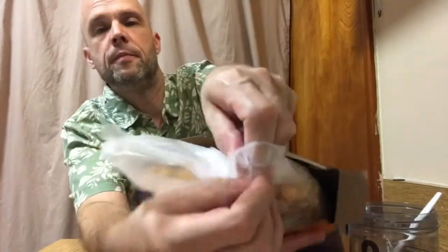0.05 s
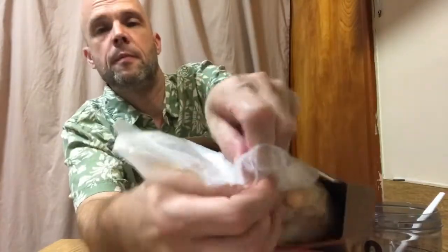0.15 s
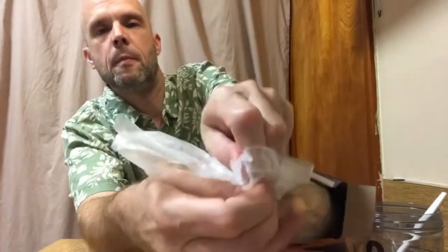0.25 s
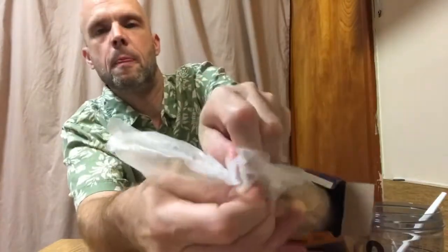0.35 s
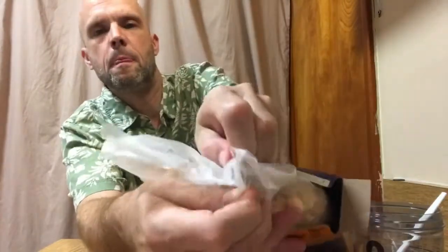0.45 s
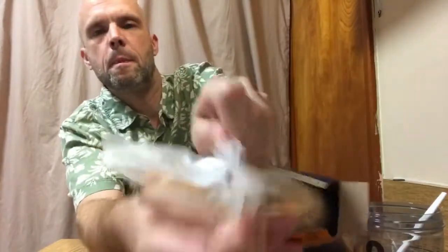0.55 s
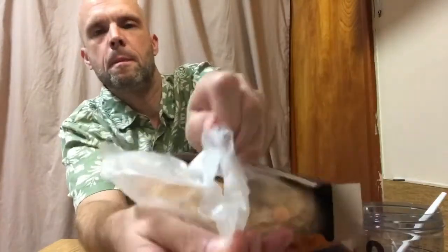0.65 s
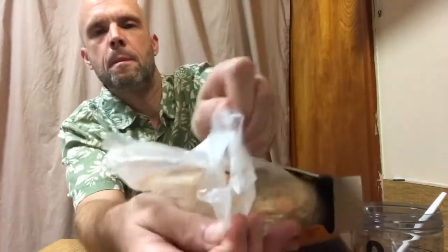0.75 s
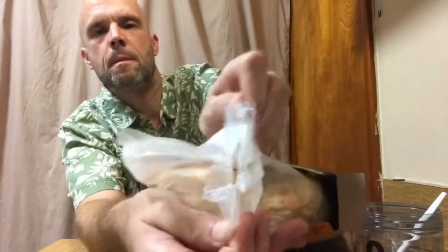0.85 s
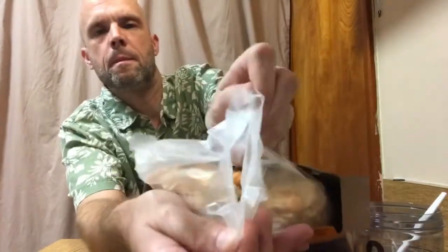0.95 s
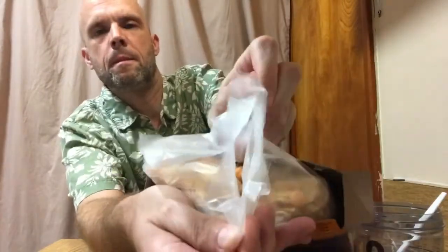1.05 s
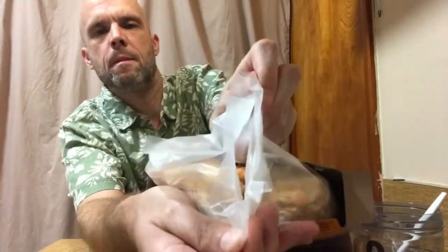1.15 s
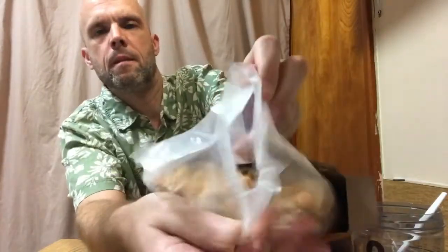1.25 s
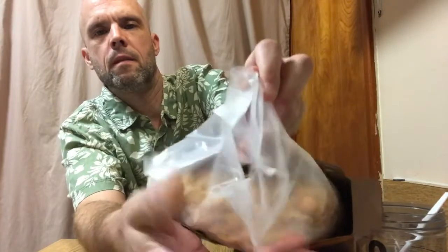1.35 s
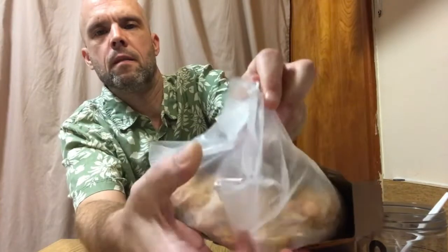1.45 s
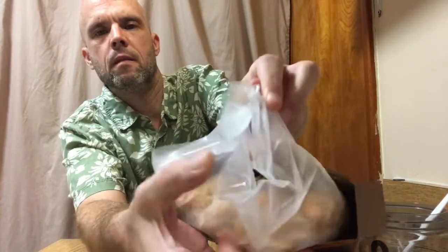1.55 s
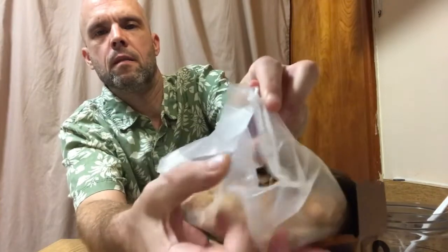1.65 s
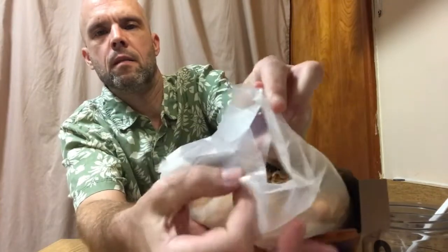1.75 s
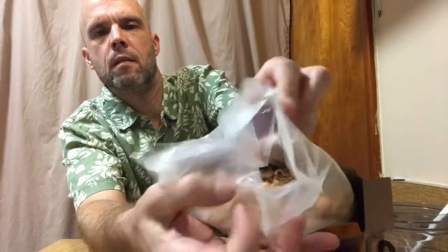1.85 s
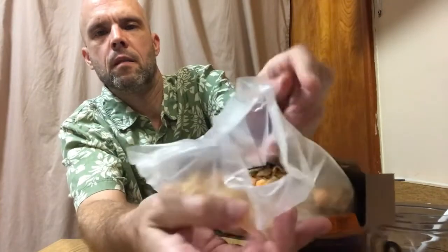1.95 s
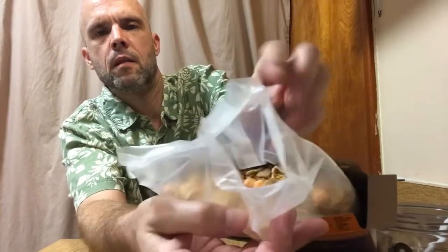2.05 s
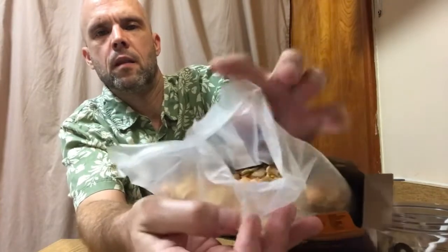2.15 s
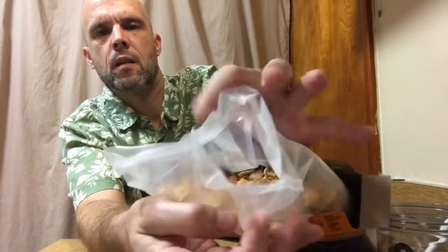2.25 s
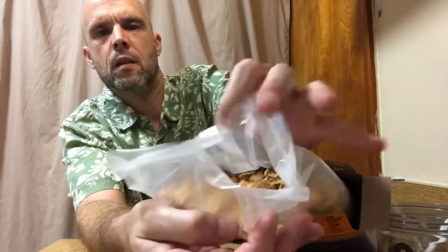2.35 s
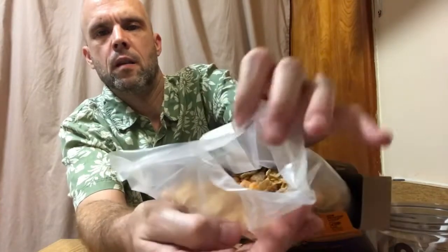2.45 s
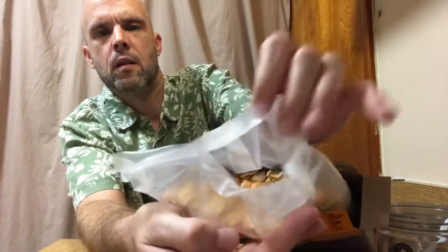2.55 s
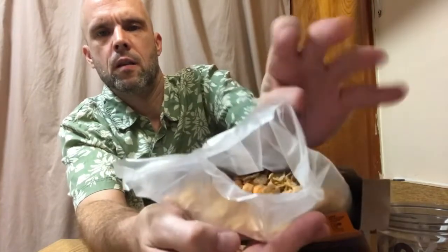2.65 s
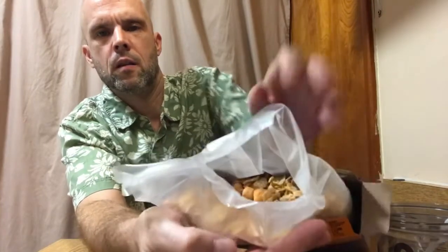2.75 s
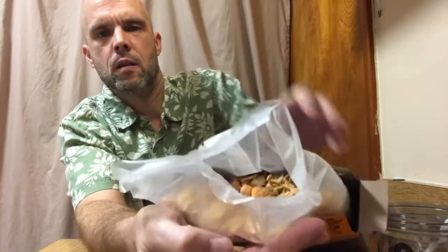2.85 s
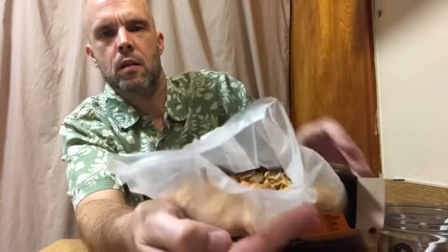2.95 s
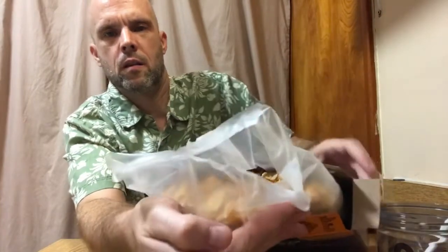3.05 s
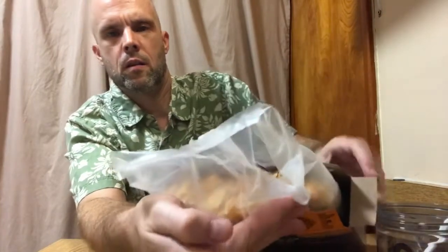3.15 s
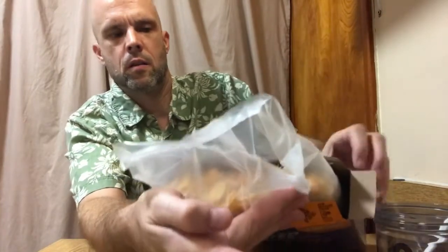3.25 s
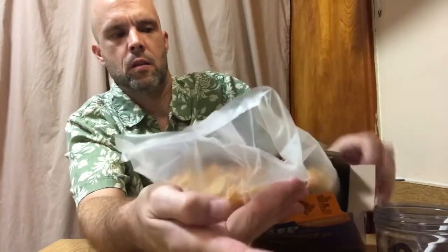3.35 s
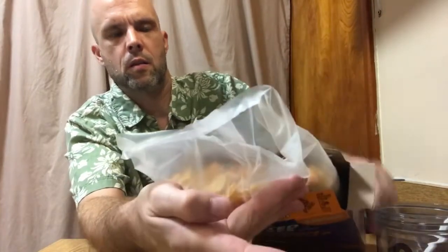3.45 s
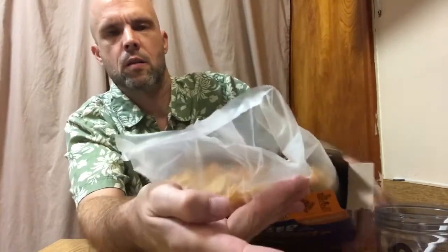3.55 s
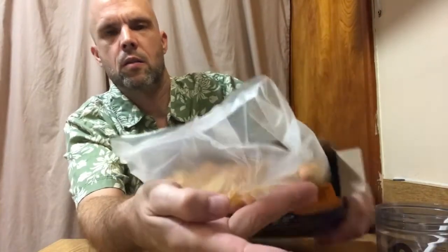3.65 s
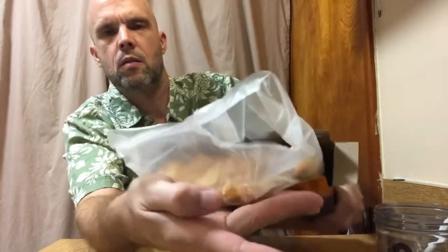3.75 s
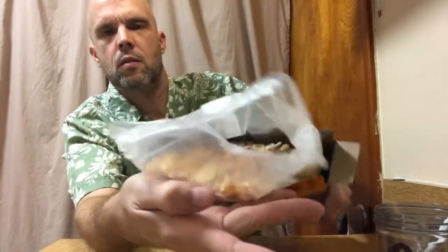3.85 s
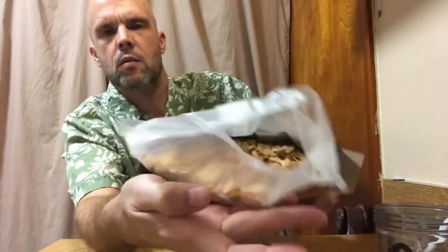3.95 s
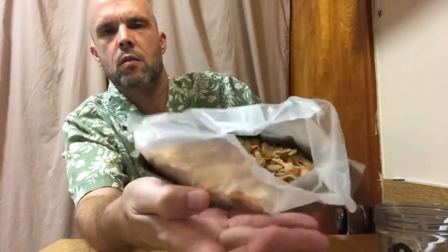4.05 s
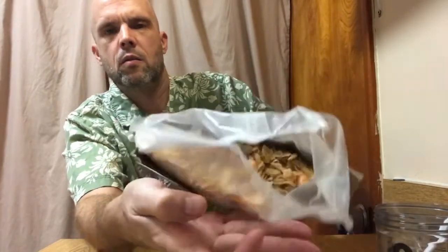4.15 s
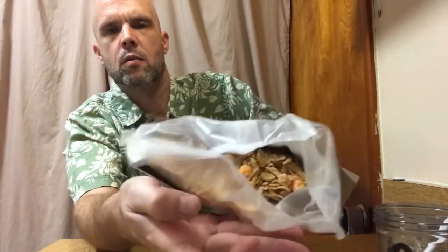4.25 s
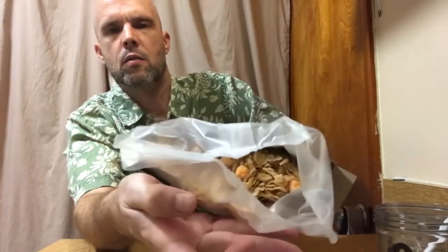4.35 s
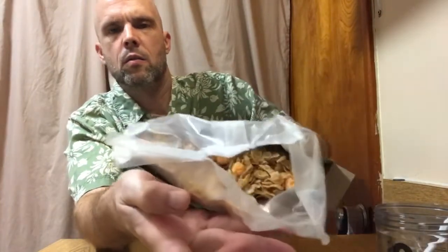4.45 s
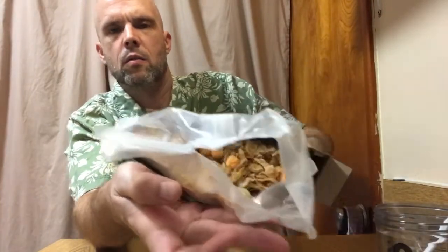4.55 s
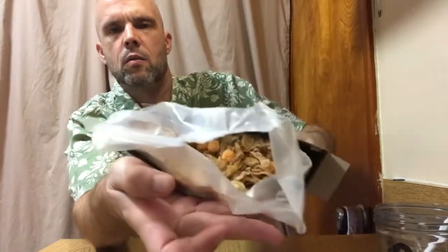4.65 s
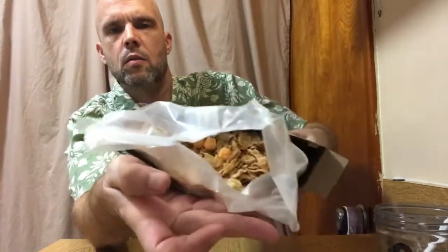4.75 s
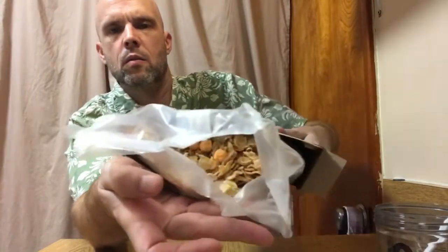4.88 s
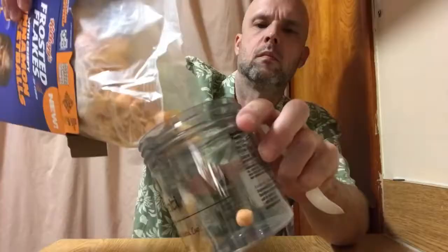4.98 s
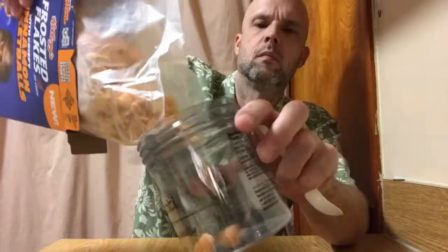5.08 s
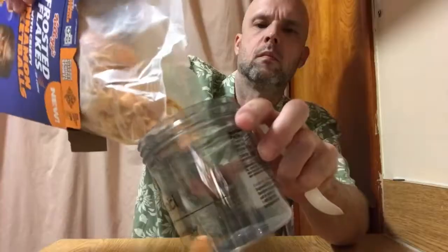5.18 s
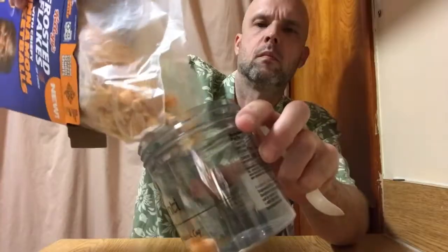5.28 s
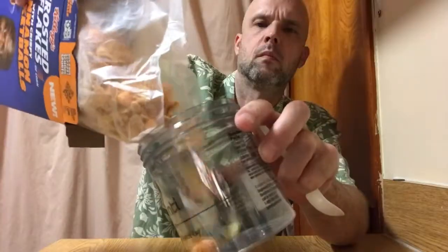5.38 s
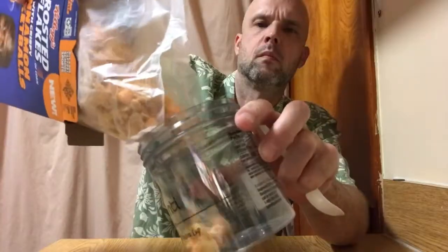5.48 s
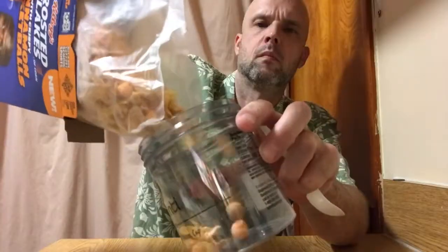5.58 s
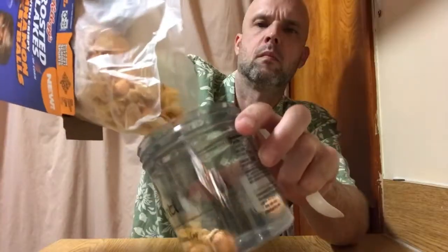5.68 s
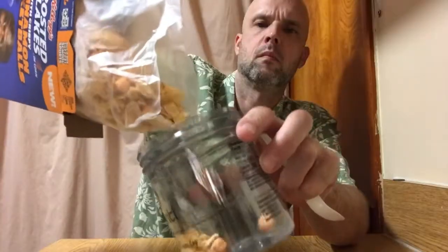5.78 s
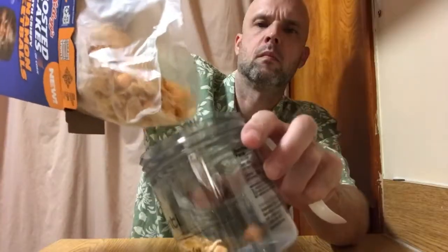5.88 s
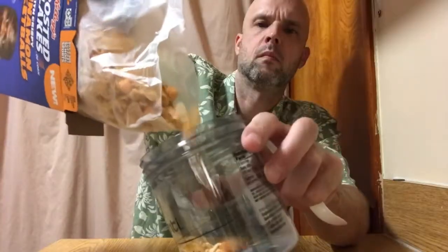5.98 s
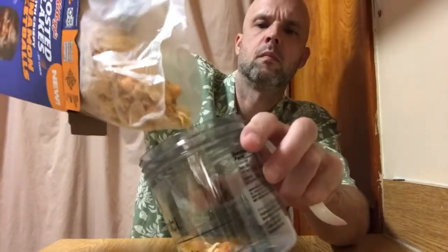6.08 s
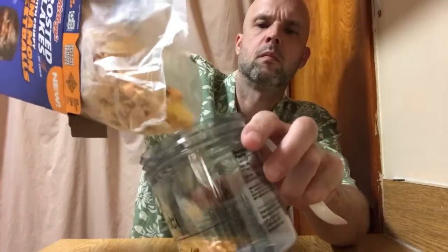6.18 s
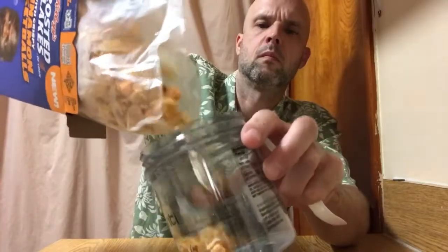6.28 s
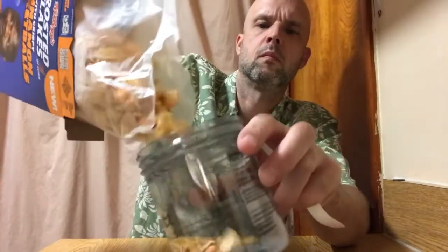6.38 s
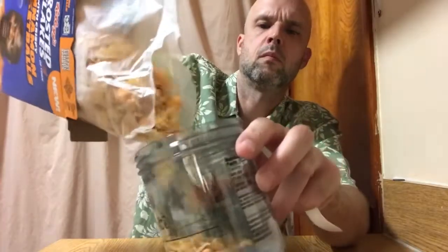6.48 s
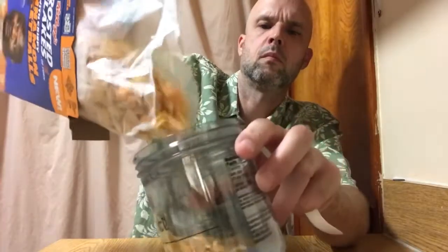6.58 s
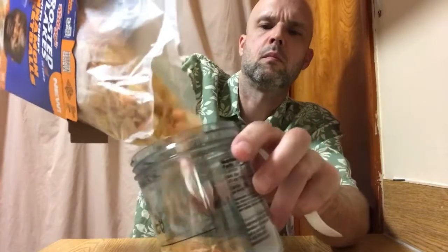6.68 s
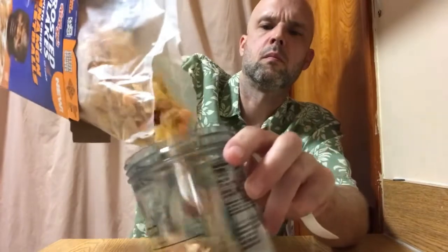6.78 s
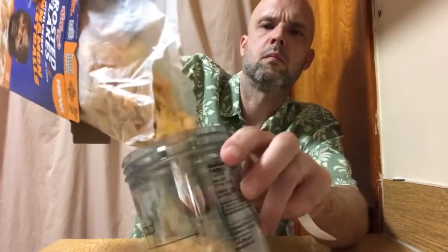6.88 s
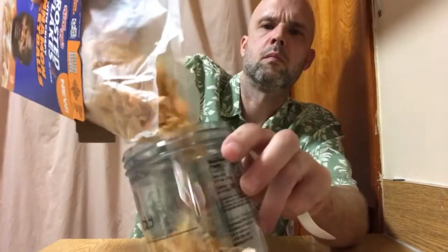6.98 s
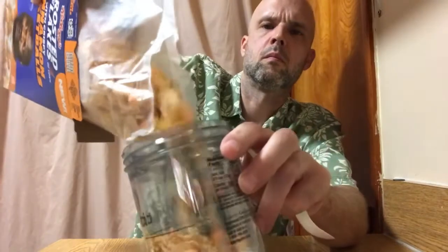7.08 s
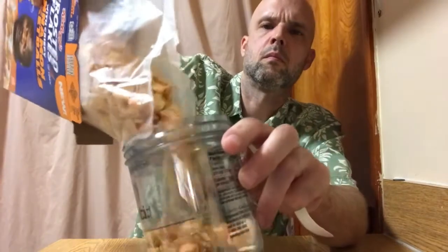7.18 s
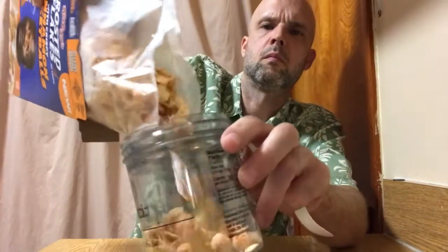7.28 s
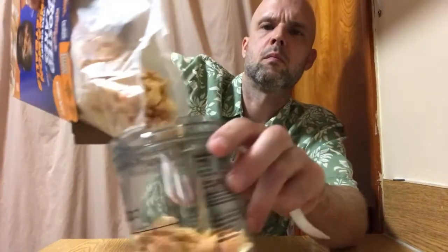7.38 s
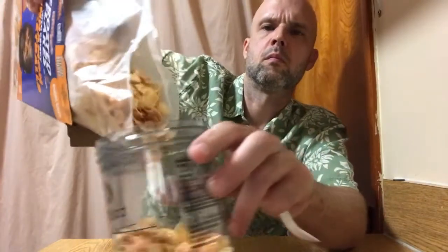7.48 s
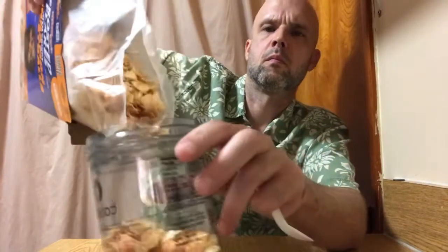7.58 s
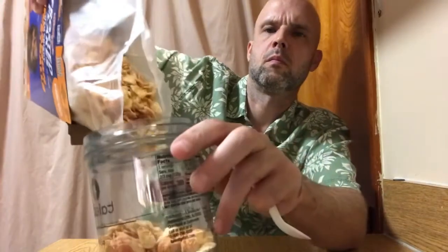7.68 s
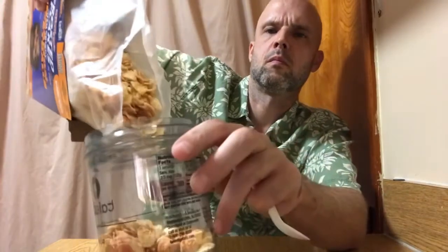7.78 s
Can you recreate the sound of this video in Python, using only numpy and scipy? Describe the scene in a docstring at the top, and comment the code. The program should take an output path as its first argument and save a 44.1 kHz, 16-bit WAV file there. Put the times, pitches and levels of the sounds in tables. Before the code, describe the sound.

A stiff plastic liner bag snaps and crackles loudly as it is pulled open, then dry cereal clatters into a hollow plastic cup.

```python
"""Plastic film snaps, creaks and crackles as a cereal liner is pulled open, with dull knocks on its carton.
Then flakes and puffed balls clatter into a hollow plastic cup, over a low hum in a small room.
Film sounds are noise bursts, random ticks and repeated slips, coloured by spectra and resonances.
Carton and cup are banks of struck, decaying modes; pieces add noise clacks and brittle crunches.
Crumbs and sliding flakes are grains of noise; the hum is a sine over filtered noise."""
import sys
import numpy as np
from scipy import signal
from scipy.fft import rfft, irfft
from scipy.io import wavfile

SR = 44100
rng = np.random.default_rng(int(sys.argv[2]) if len(sys.argv) > 2 else 0)


def file_out(sig):
    """Save sig as 16-bit WAV at sys.argv[1]."""
    # one column per channel
    cols = np.atleast_2d(sig).T
    # limit, then scale
    lim = np.clip(cols, -1, 1)
    pcm = np.round(lim * 32767).astype(np.int16)
    wavfile.write(sys.argv[1], SR, pcm)


N = 344862
TIME = np.arange(N) / SR
POUR_START_S = 4.966

# spectrum of a dry piece clacking on the cup: (frequency [Hz], level [dB])
CLACK_SPECTRUM = [(400, -36), (700, 5), (1150, -5.5), (2200, -3.5), (3500, -7), (5000, -9), (7500, -12),
                  (12000, -35)]
# spectrum of brittle edges breaking: (frequency [Hz], level [dB])
CRUNCH_SPECTRUM = [(1500, -18.5), (3500, 4), (5000, 2), (6700, 1), (8000, -8.5), (9300, -2), (10400, -11),
                   (11700, -8), (16000, -3)]


def from_db(db):
    """Decibels to gain."""
    return 10 ** (np.asarray(db) / 20)


def rms_one(x):
    """Scale to rms 1."""
    return x / np.sqrt(np.mean(x ** 2) + 1e-20)


def attack_one(x, size=220):
    """Scale a hit so that its first samples have rms 1."""
    return x / np.sqrt(np.mean(x[:size] ** 2) + 1e-20)


def over_time(points):
    """Read a (time, level) curve at every sample."""
    s, level = np.transpose(points)
    return np.interp(TIME, s, level)


def at_hz(points, hz):
    """Read a table on a log-frequency axis."""
    f, value = np.transpose(points)
    return np.interp(np.log(np.maximum(hz, 1)), np.log(f), value)


def add(out, s, sound):
    """Mix a sound in at time s, trimming whatever falls outside the scene."""
    start = round(s * SR)
    sound, start = sound[max(-start, 0):], max(start, 0)
    out[start:start + len(sound)] += sound[:max(N - start, 0)]


def response(spectrum, size=4096):
    """Causal (minimum-phase) impulse response with the given spectrum."""
    magnitude = from_db(at_hz(spectrum, np.fft.rfftfreq(size, 1 / SR)))
    cepstrum = irfft(np.log(magnitude))
    # fold the cepstrum forward in time to get minimum phase
    cepstrum[1:size // 2] *= 2
    cepstrum[size // 2 + 1:] = 0
    return irfft(np.exp(rfft(cepstrum)))[:size // 2]


def through(x, impulse):
    """Pass a signal through an impulse response."""
    return signal.oaconvolve(x, impulse)[:len(x)]


def band(x, hz, kind, order=2):
    """Butterworth filter."""
    sos = signal.butter(order, np.clip(hz, 10, 0.45 * SR), kind, fs=SR, output="sos")
    return signal.sosfilt(sos, x)


def resonance(x, hz, q):
    """One resonant peak."""
    return signal.lfilter(*signal.iirpeak(min(hz, SR / 3), q, SR), x)


def fading(t60, size):
    """Exponential decay by 60 dB in t60 seconds."""
    return np.exp(-np.log(1000) * TIME[:size] / t60)


def burst(t60, size=4096):
    """Noise that dies away: many close, damped modes."""
    return rng.standard_normal(size) * fading(t60, size)


def struck(modes, scatter_db, tilt_db=0, detune=0.01, size=8192):
    """Ringing modes; each blow lands elsewhere, under a shifting load: new strengths, slightly new pitches."""
    hz, db, t60 = np.transpose(modes)[:, :, None]
    hz = hz * (1 + detune * rng.standard_normal(hz.shape))
    gain = from_db(db + tilt_db + scatter_db * rng.standard_normal(hz.shape))
    gain = gain * rng.choice([-1, 1], hz.shape)
    return np.sum(gain * np.sin(2 * np.pi * hz * TIME[:size]) * fading(t60, size), axis=0)


def grains(spectrum, per_s, spread_db, t60):
    """Random ticks of uneven size, each a fresh burst of noise that dies away; rms 1."""
    at = np.flatnonzero(rng.random(N) < per_s / SR)
    kicks = np.full(N, 1e-18)
    kicks[at] = from_db(spread_db * np.minimum(rng.exponential(1, N)[at], 4)) ** 2
    # every kick of energy leaks away by 60 dB in t60
    energy = signal.lfilter([1], [1, -from_db(-120 / (t60 * SR))], kicks)
    return rms_one(through(np.sqrt(energy) * rng.standard_normal(N), response(spectrum)))


def swarm(events, spread_s):
    """Level of the small ticks that crowd around each large event."""
    out = np.zeros(N)
    bell = signal.windows.gaussian(4096, spread_s * SR)
    for s, db, *_ in events:
        add(out, s - len(bell) / 2 / SR, from_db(db) * bell)
    return out


def scattered(start_s, end_s, per_s, level_db, low_hz, high_hz, spread_db=3.5):
    """Chance events whose strength follows a level curve: rows (time [s], level [dB], pitch [Hz])."""
    when, strength, pitch = rng.random((200, 3)).T
    # one event in each slot of 1 / per_s seconds
    s = start_s + (np.arange(len(when)) + when) / per_s
    db = np.interp(s, TIME, level_db) + spread_db * (2 * strength - 1)
    hz = low_hz * (high_hz / low_hz) ** pitch
    return np.transpose([s, db, hz])[s < end_s]


def background(hum_hz=59.2, hum_db=-57, air_db=-54.5):
    """Room rumble with a faint hiss, as filtered noise, and a low sine hum."""
    # (frequency [Hz], level [dB])
    room_tone = [(25, -21), (40, -10), (55, -2), (70, -3), (125, -4), (165, -9), (240, -21), (450, -32),
                 (800, -37), (1700, -42), (4000, -47), (16000, -60)]
    air = rms_one(through(rng.standard_normal(N), response(room_tone, size=16384)))
    hum = rms_one(np.sin(2 * np.pi * hum_hz * TIME))
    return from_db(air_db) * air + from_db(hum_db) * hum


def effort(attack_s=0.014, release_db_per_s=334):
    """How hard the film is worked, in dB: each tug rises, holds and lets go, over a slower strain."""
    # tugs of the hands: (time of full pull [s], hold [s], crackle level [dB])
    tugs = [(0.0, 0.081, -31), (0.126, 0.18, -31), (0.368, 0.058, -36.5), (0.535, 0.061, -34.5),
            (0.735, 0.063, -43), (0.871, 0.039, -36.5), (1.019, 0.2, -38), (1.217, 0.047, -30.5),
            (1.371, 0.059, -33.5), (1.494, 0.025, -37), (1.6, 0.041, -42), (1.693, 0.048, -39),
            (1.82, 0.056, -36.5), (2.122, 0.058, -42.5), (2.31, .17, -45.5), (2.534, 0.081, -39),
            (2.939, 0.12, -39.5), (3.119, .08, -51), (3.519, 0.31, -53.5), (3.583, 0.19, -46),
            (3.995, 0.12, -52.5), (4.11, 0.14, -60)]
    # strain between tugs, as its crackle; it eases once the bag is open: (time [s], level [dB])
    strain = [(0, -46.5), (1.85, -47.5), (2.55, -54), (2.72, -62.5), (3.45, -67), (3.85, -57.5),
              (4.38, -68.5), (4.65, -63), (4.93, -70)]
    power = from_db(over_time(strain)) ** 2
    t = TIME[:SR] - attack_s
    rise = np.clip(1 + t / attack_s, 0, 1)
    for s, hold, db in tugs:
        tug_db = db - release_db_per_s * np.maximum(t - hold, 0)
        add(power, s - attack_s, (rise * from_db(tug_db)) ** 2)
    return 10 * np.log10(power)


def snap(film, hz, treble_db, crack_t60=0.013, flutter_db=-19, flutter_t60=0.093, facet_q=3.3, facet_db=-1):
    """A crease flips: a crack, the short ring of its facet, and a flutter of the film around it."""
    kick = burst(crack_t60) + from_db(flutter_db) * burst(flutter_t60)
    # a slack crease flips slowly and sounds dull throughout
    body = band(through(kick, film), 14000 * from_db(1.7 * treble_db), "low", order=1)
    facet = attack_one(resonance(body, hz, facet_q))
    body = attack_one(attack_one(body) + from_db(facet_db) * facet)
    treble = attack_one(band(kick, 7400, "high", order=3))
    return attack_one(body + from_db(treble_db) * treble)


def creak(film, length, first_rate, last_rate, hz, q, slip_t60=0.0055, rub_db=-1):
    """Near-regular stick-slip jerks, swelling and fading, shake the film and one of its resonances."""
    size = int(length * SR)
    phase = np.cumsum(np.linspace(first_rate, last_rate, size)) / SR
    slips = np.diff(np.floor(phase), prepend=0)
    rub = through(through(slips, fading(slip_t60, size)) * rng.standard_normal(size), film)
    rub = rms_one(band(rub, 2 * hz, "low", order=1))
    sound = rms_one(resonance(slips, hz, q)) + from_db(rub_db) * rub
    return rms_one(sound * signal.windows.tukey(size, 0.5))


def bag():
    """Snaps, creaks and rushing folds stand over a fine crackle and the dull flexing of the sheet."""
    # loudest creases flipping over: (time [s], level [dB], facet pitch [Hz])
    snaps = [(0.0223, -20, 4300), (0.1255, -31, 2540), (0.2452, -18, 4650), (0.2662, -32, 3450),
             (0.2875, -18.5, 6140), (0.3236, -27, 3160), (0.3315, -26, 6700), (0.3636, -24, 3760),
             (0.4108, -24.5, 5900), (0.4844, -28.5, 4000), (0.4979, -18.5, 1520), (0.528, -19.5, 4050),
             (0.5398, -15, 3860), (0.5932, -24.5, 3490), (0.659, -29, 4040), (0.7125, -28, 3900),
             (0.7706, -28.5, 1580), (0.8753, -18.5, 4400), (0.909, -19, 4260), (0.99, -33.5, 4310),
             (1.0235, -31, 4480), (1.0628, -25.5, 3950), (1.1333, -29.5, 2860), (1.174, -24, 2760),
             (1.2559, -19, 4700), (1.4175, -24.5, 3280), (1.4636, -27.5, 1770), (1.586, -23.5, 1870),
             (1.6113, -26, 7460), (1.6943, -24, 6240), (1.7341, -21.5, 4430), (1.8246, -33, 4100),
             (1.8655, -26.5, 4370), (2.0384, -35, 1580), (2.086, -32, 1860), (2.1382, -27.5, 5600),
             (2.2027, -28, 5060), (2.223, -31, 3570), (2.3342, -32, 5640), (2.3711, -32.5, 3830),
             (2.436, -30.5, 2750), (2.4688, -32, 4180), (2.517, -27, 4100), (2.5411, -18, 4340),
             (2.8539, -41.5, 2670), (2.9213, -34.5, 3120), (2.9415, -30.5, 4610), (2.9923, -23.5, 6800),
             (3.12, -36, 4870), (3.2837, -48, 1980), (3.685, -35, 2020), (4.0439, -30, 2500),
             (4.1803, -39, 3420), (4.2214, -41, 2040), (4.6596, -49.5, 1884), (4.7916, -53.5, 1700),
             (5.3585, -35, 6500), (7.524, -45, 6500)]
    # film sticking and slipping under the fingers:
    # (time [s], length [s], slips at start [1/s], slips at end [1/s], level [dB], resonance [Hz], Q [-])
    creaks = [(0.04, 0.069, 360, 244, -35, 3830, 14), (1.019, 0.2, 137, 120, -45, 135, 12),
              (1.621, 0.062, 290, 394, -41.5, 1060, 15), (3.155, 0.043, 390, 360, -47, 2100, 8.4)]
    # whole folds giving way in a rush of small snaps: (time [s], level [dB], t60 [s])
    crushes = [(0.364, -19.5, 0.056), (0.526, -25, 0.22), (.537, -16.5, 0.19), (.872, -24, 0.25),
               (.908, -23.5, .12), (1.243, -30.5, 0.3), (1.413, -37, 0.16), (1.504, -26, 0.1),
               (2.545, -25.5, 0.24), (3.747, -44, 0.088)]
    # colours of snaps and creaks, of the crackle, and of the flexing: (frequency [Hz], level [dB])
    film_spectrum = [(100, -18), (300, -4.5), (700, -7.5), (1600, -0.5), (4000, 2.5), (7000, 0.5),
                     (9000, -7), (10500, -21), (16000, -25)]
    crackle_spectrum = [(200, -13), (450, -5.5), (800, 1.5), (1500, 3.5), (4100, 1.5), (5200, -2.5),
                        (6800, -1), (10400, -13), (12000, -7), (15500, -12)]
    flex_spectrum = [(50, -31.5), (90, -9.5), (130, 0.5), (180, -5), (240, -2.5), (340, 0.5), (460, -11.5),
                     (700, -7.5), (1500, -35.5)]
    out, film, effort_db = np.zeros(N), response(film_spectrum), effort()

    # lesser creases flip at random, 3 dB over the crackle on average
    small = scattered(0, POUR_START_S, per_s=10, level_db=effort_db + 3, low_hz=1500, high_hz=6500)
    for s, db, hz in [*snaps, *small]:
        # small facets and hard snaps are brighter: 1 dB per octave, 0.16 dB per dB
        treble_db = -4.5 + np.log2(hz / 4000) + 0.16 * (db + 25)
        add(out, s, from_db(db) * snap(film, hz, treble_db))

    for s, length, first_rate, last_rate, db, hz, q in creaks:
        add(out, s, from_db(db) * creak(film, length, first_rate, last_rate, hz, q))

    rush = from_db(-16) * swarm(snaps, spread_s=0.005)
    for s, db, t60 in crushes:
        add(rush, s, from_db(db) * fading(t60, size=16384))
    out += rush * grains(crackle_spectrum, per_s=2200, spread_db=1.5, t60=0.005)

    crackle = grains(crackle_spectrum, per_s=550, spread_db=3.0, t60=0.011)
    # gentle handling is duller: below -30 dB the top falls 0.55 dB per dB of effort
    dull = band(crackle, 4800, "low", order=1)
    crackle = dull + (crackle - dull) * np.clip(from_db(0.55 * (effort_db + 30)), 0, 1)
    # the whole sheet flexes with 0.71 of the swing of the effort
    flex = grains(flex_spectrum, per_s=300, spread_db=-0.5, t60=0.012)
    flex_db = -41.5 + 0.71 * (effort_db + 35)
    handling = from_db(effort_db) * crackle + from_db(flex_db) * flex
    return out + (TIME < POUR_START_S) * handling


def carton():
    """Knocks on the cardboard; a soft contact reaches only its lowest modes."""
    # (time [s], level [dB], contact cut-off [Hz])
    bumps = [(0.123, -35.5, 500), (0.365, -33, 350), (.545, -26.5, 257), (0.591, -34, 110),
             (0.906, -26, 200), (1.261, -32.5, 150), (1.508, -35.5, 110), (2.621, -40, 111.5),
             (3.731, -28, 520), (6.018, -40.5, 500)]
    # cardboard modes: (frequency [Hz], level [dB], t60 [s])
    modes = [(85, -9.5, 0.18), (130, -2.5, 0.055), (192, -4, 0.14), (275, -3.5, 0.032), (359, -1, 0.17),
             (398, 4.5, 0.015), (520, 3, 0.021), (900, -2, 0.026)]
    out = np.zeros(N)
    for s, db, contact_hz in bumps:
        knock = band(struck(modes, scatter_db=2.5), contact_hz, "low")
        add(out, s, from_db(db) * attack_one(knock, size=600))
    return out


def landing(clack, hz, crack_t60=0.015, focus_db=9, wall_db=-3, settle_db=-18, settle_t60=0.15,
            contact_s=0.00071, piece_db=-4):
    """A dry piece clacks on the cup and settles; piece and wall ring most near hz."""
    # modes of the cup's wall: (frequency [Hz], level [dB], t60 [s])
    wall_modes = [(1406, -1, 0.096), (1576, 6, 0.012), (1985, 4, 0.083), (2160, -5.5, 0.076),
                  (2500, 5.5, 0.026), (2430, -1, 0.021), (2560, -15, 0.16), (2760, -12, 0.036),
                  (3350, -18, 0.036), (3290, 12.5, 0.011), (3410, -1, 0.015), (3500, -6, 0.09),
                  (3826, 2.5, 0.045), (4250, -9.5, 0.21), (4400, -26.5, 0.095), (5730, 2.5, 0.06),
                  (5860, 2.5, 0.036), (6430, -8, 0.0088), (7000, -6, 0.09), (7960, -10, 0.1)]
    kick = burst(crack_t60) + from_db(settle_db) * burst(settle_t60)
    crack = attack_one(through(kick, clack), size=350)
    piece = from_db(piece_db) * attack_one(resonance(crack, hz, q=6), size=350)
    # wall modes weaken by focus_db per octave away from hz
    octaves = np.abs(np.log2(np.array(wall_modes)[:, :1] / hz))
    wall = struck(wall_modes, scatter_db=4.5, tilt_db=-focus_db * octaves, size=4096)
    wall = from_db(wall_db) * attack_one(wall, size=350)
    contact = 1 - np.exp(-TIME[:len(wall)] / contact_s)
    return attack_one((crack + piece + wall) * contact, size=350)


def hollow():
    """The cup's body takes a moment to swing up and radiates little below its lowest mode."""
    # lowest modes of the cup: (frequency [Hz], level [dB], t60 [s])
    body_modes = [(606, -2, .08), (640, -3, .06), (728, 1, .075), (772, -1, .055), (950, -10, .05),
                  (1015, -13, .05)]
    ring = band(struck(body_modes, scatter_db=2, size=5500), 555, "high", order=10)
    return attack_one(band(ring, 1200, "low"), size=600)


def brittle_edges(crunch):
    """Brittle edges crack, then scrape along the wall."""
    return attack_one(through(burst(0.02) + from_db(-15) * burst(0.12), crunch), size=350)


def patter():
    """Small crumbs hitting the cup, each size with a pitch of its own; rms 1."""
    crumbs = np.zeros(N)
    for hz in (2040, 2420, 3770, 5160):
        ticks = grains(CLACK_SPECTRUM, per_s=80, spread_db=2.8, t60=0.014)
        crumbs += rms_one(resonance(ticks, hz, q=2.5))
    crumbs = rms_one(crumbs)
    crumbs += from_db(-6) * grains(CRUNCH_SPECTRUM, per_s=200, spread_db=3.3, t60=0.013)
    # each also gives the hollow body a faint knock
    knocks = band(crumbs, [590, 810], "band", order=4)
    return rms_one(crumbs + from_db(-8.5) * rms_one(knocks))


def cereal():
    """Big pieces land one by one amid a patter of crumbs, while flakes hiss down the film."""
    # loudest pieces: (time [s], clack level [dB], hollow ring level [dB], brightest pitch [Hz])
    landings = [(4.9664, -22.5, -18, 2380), (4.9812, -24, -32.5, 2200), (4.9874, -22, -36, 2040),
                (5.0155, -22.5, -29, 3300), (5.0263, -29.5, -35, 4440), (5.0609, -27.5, -32, 2000),
                (5.1094, -35, -42, 2020), (5.2813, -27, -27.5, 2070), (5.3789, -17, -28, 3300),
                (5.4069, -22, -29.5, 4130), (5.416, -23, -31, 3850), (5.4417, -27.5, -33, 2450),
                (5.4645, -21.5, -29, 4440), (5.4786, -25, -29, 2060), (5.5003, -25.5, -27, 3320),
                (5.5874, -16, -22.5, 3100), (5.6577, -18.5, -21.5, 1960), (5.7014, -34, -44, 5800),
                (5.742, -32, -29.5, 2000), (5.9243, -36, -37, 2020), (6.0778, -28, -33, 3920),
                (6.0924, -32.5, -48, 2020), (6.1236, -30.5, -36, 3880), (6.2307, -30, -48, 3880),
                (6.3201, -23, -24.5, 2460), (6.3329, -16, -27, 3230), (6.4122, -28.5, -41.5, 2000),
                (6.5456, -29.5, -38, 4370), (6.6272, -33.5, -48, 5340), (6.7031, -25, -37.5, 4140),
                (6.7582, -24, -27, 2500), (6.8033, -15.5, -18, 2370), (6.8687, -35, -27, 2560),
                (6.883, -19.5, -32, 2460), (6.9002, -26, -35, 2360), (6.9092, -29, -46, 2500),
                (6.9791, -35, -30.5, 2370), (7.0223, -27, -28.5, 2530), (7.0681, -25, -32, 2380),
                (7.0816, -21, -32, 2550), (7.1372, -20.5, -22.5, 2040), (7.1915, -22.5, -28.5, 2600),
                (7.2248, -21, -21.5, 2100), (7.2444, -25.5, -47, 3740), (7.2967, -28, -37.5, 2110),
                (7.3242, -29, -41, 2460), (7.398, -33.5, -44.5, 2350), (7.5255, -35, -38, 1580),
                (7.5601, -45, -45, 3860), (7.7453, -41.5, -40, 2390)]
    # flow of cereal, as the patter of crumbs: (time [s], level [dB])
    flow = [(5.1, -45), (5.14, -44), (5.58, -38), (5.72, -50), (5.96, -39.5), (6.3, -38), (6.64, -39.5),
            (7.16, -32.5), (7.49, -50), (7.82, -61.5)]
    # colour of flakes on film: (frequency [Hz], level [dB])
    slide_spectrum = [(150, 13), (340, 19.5), (460, 7), (1500, 18.5), (4000, -5), (7000, 6), (9300, 5.5),
                      (10400, 2.5), (11500, 13), (15500, 1.5)]
    out, clack, crunch = np.zeros(N), response(CLACK_SPECTRUM), response(CRUNCH_SPECTRUM)
    flow_db = over_time(flow)

    # lighter pieces land at random; clack 2.5 dB over the patter, hollow ring 7 dB under it
    chance = scattered(POUR_START_S, N / SR, per_s=10, level_db=flow_db, low_hz=1970, high_hz=4180)
    small = [(s, db + 2.5, db - 7, hz) for s, db, hz in chance]
    for s, clack_db, hollow_db, hz in [*landings, *small]:
        add(out, s, from_db(clack_db) * landing(clack, hz))
        add(out, s, from_db(hollow_db) * hollow())
        # crunch follows the blow; round pieces, which make the cup ring, crunch less
        crunch_db = -31.5 + (clack_db + 27) - 0.47 * (hollow_db + 34)
        add(out, s, from_db(crunch_db) * brittle_edges(crunch))

    crumb_gain = from_db(flow_db) + from_db(-18) * swarm(landings, spread_s=0.004)
    crumbs = crumb_gain * patter()
    # flakes slide with 0.36 of the swing of the flow, until the bag is tipped back
    tip_back_s, release_db_per_s = 6.9, 7
    slide_db = -47 + 0.36 * (flow_db + 40) - release_db_per_s * np.maximum(TIME - tip_back_s, 0)
    hiss = band(grains(slide_spectrum, per_s=600, spread_db=3.0, t60=0.01), 70, "high")
    flakes = from_db(slide_db) * hiss
    return out + (crumbs + flakes) * (TIME >= POUR_START_S)


def room(x, wet_db=-13, first_echo_s=0.0017, size=20000):
    """Diffuse echoes: bands of noise, each with its own decay, under a softened top."""
    # reverberation: (frequency [Hz], t60 [s])
    decay = [(100, 0.14), (700, 0.24), (2000, 0.1), (5000, 0.14), (14000, 0.27)]
    tail, edges = np.zeros(size), np.geomspace(60, 18000, 9)
    for low, high in zip(edges, edges[1:]):
        noise = band(rng.standard_normal(size), [low, high], "band")
        tail += noise * fading(at_hz(decay, np.sqrt(low * high)), size)
    tail = band(tail * (TIME[:size] > first_echo_s), 12000, "low", order=1)
    return x + from_db(wet_db) * through(x, tail / np.sqrt(np.sum(tail ** 2)))


def scene():
    """Bag, carton and cup share one small room, over its rumble and hum."""
    return (background() + room(bag() + carton() + cereal()))[None]


def record(dry, cutoff_hz=15900):
    """The top is cut steeply."""
    return signal.sosfilt(signal.ellip(10, 0.2, 80, cutoff_hz, fs=SR, output="sos"), dry)


dry = scene()
out = record(dry)
file_out(out)
```